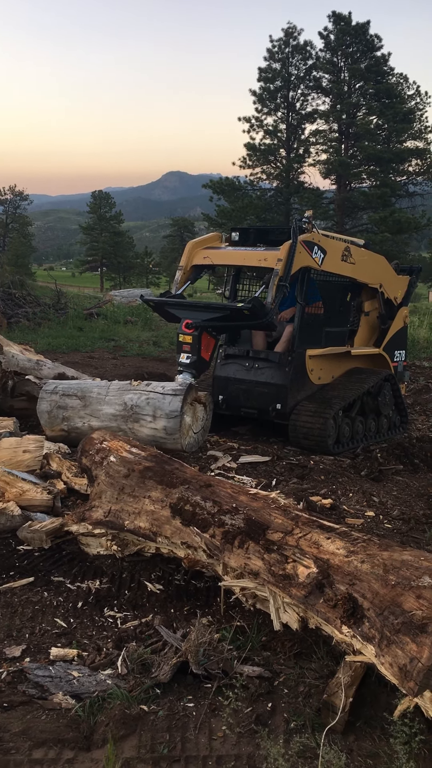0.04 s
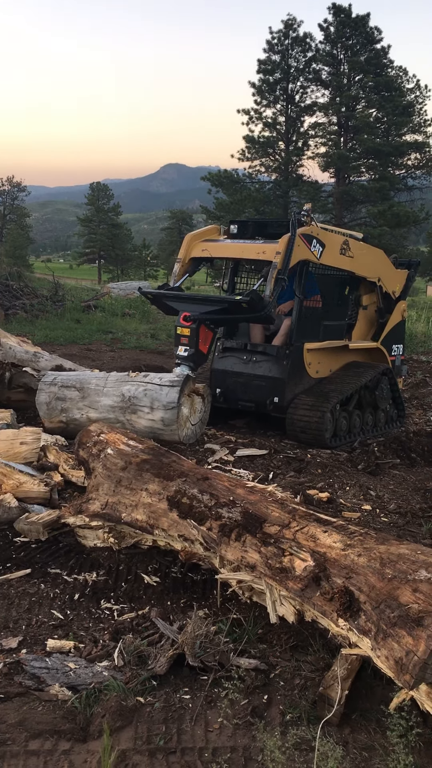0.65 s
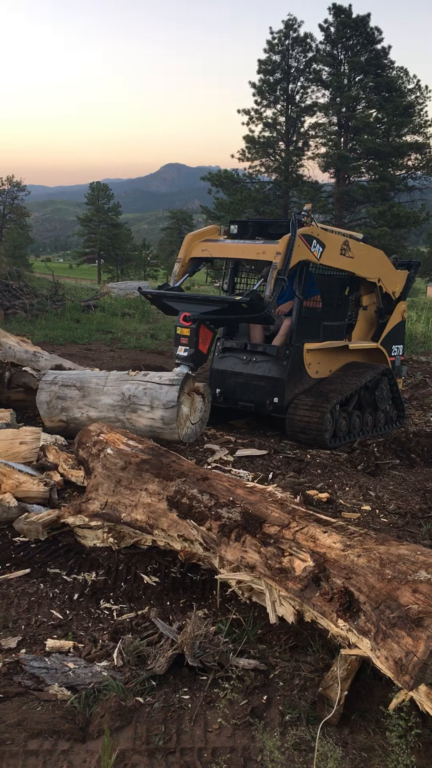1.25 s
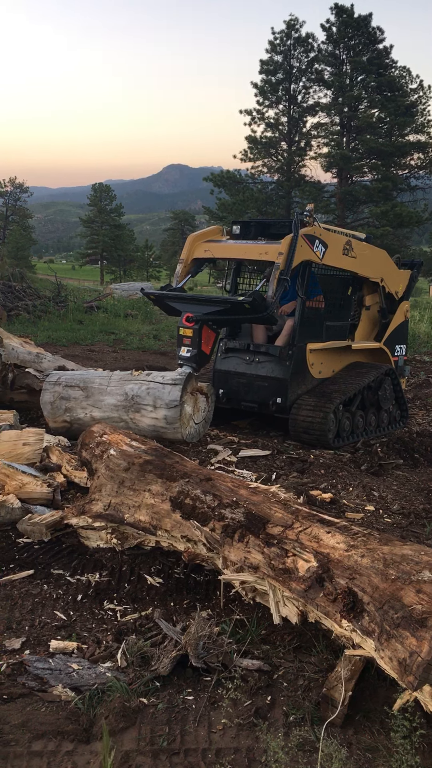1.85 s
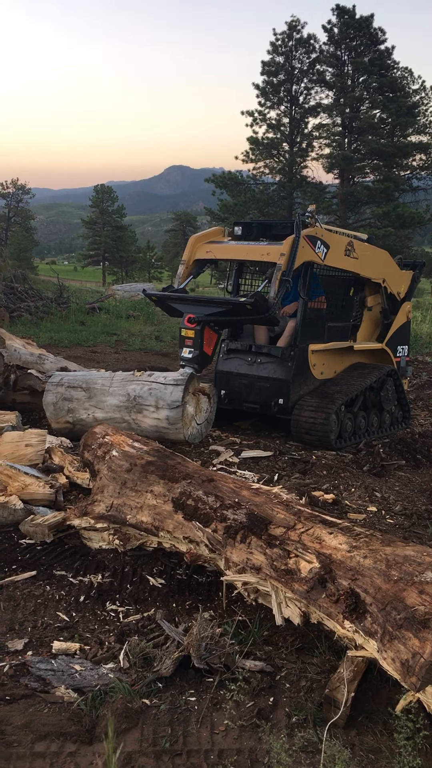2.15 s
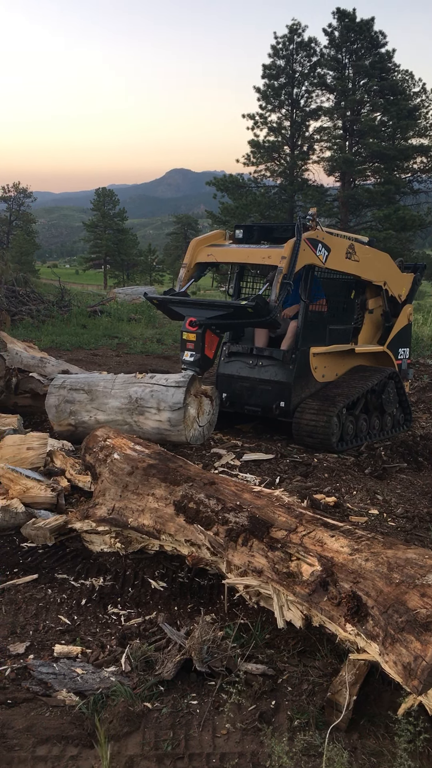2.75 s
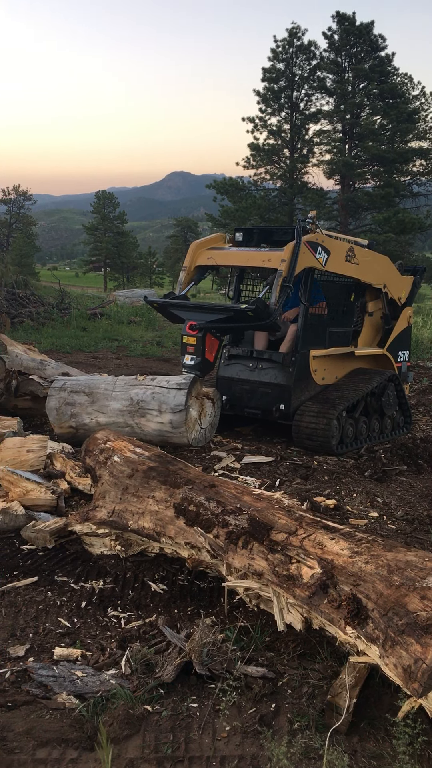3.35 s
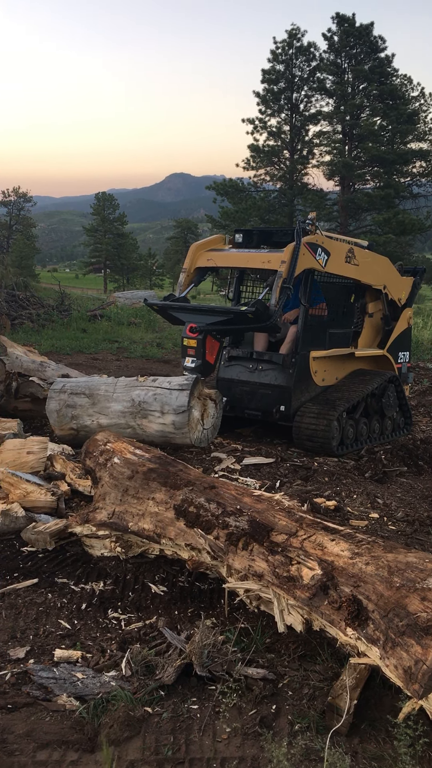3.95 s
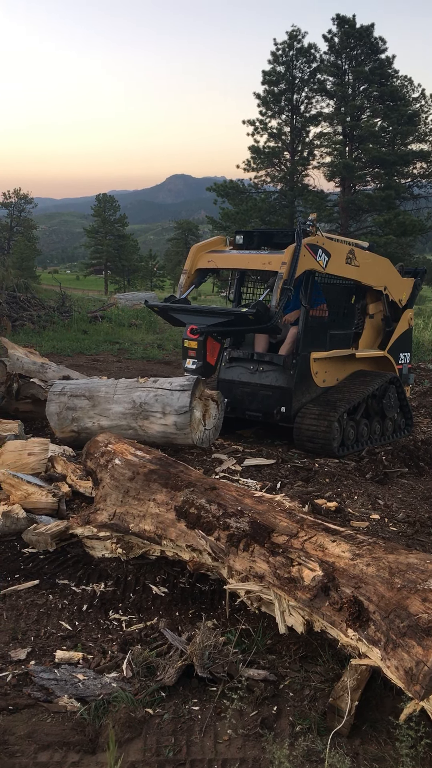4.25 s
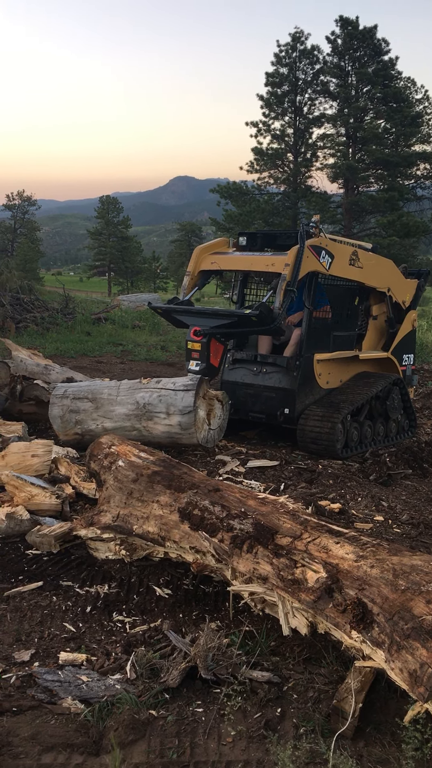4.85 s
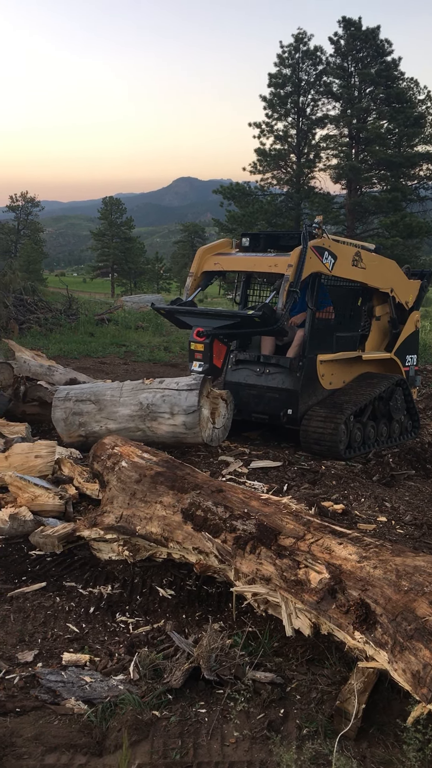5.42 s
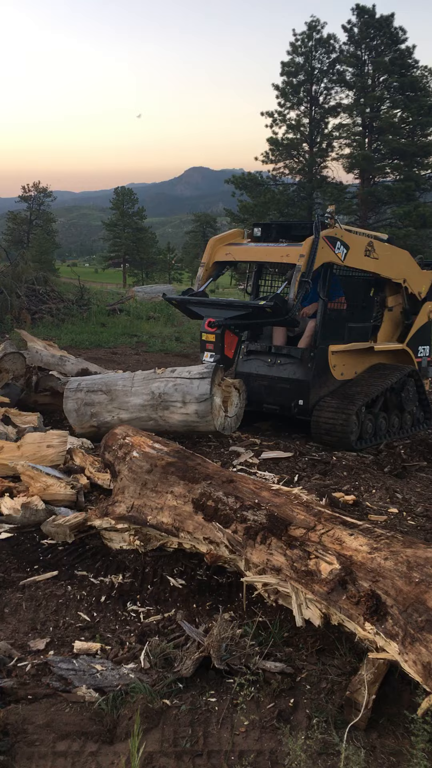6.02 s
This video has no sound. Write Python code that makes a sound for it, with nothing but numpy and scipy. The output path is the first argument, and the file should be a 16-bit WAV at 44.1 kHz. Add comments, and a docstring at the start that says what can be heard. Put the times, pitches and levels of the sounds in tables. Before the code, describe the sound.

In an open clearing, a few metres from the microphone, dry wood crackles and snaps over the low boom of a straining diesel engine. Louder cracks and deep woody thuds follow as a splitter forces the log apart. Midway the engine swells with a hiss of hydraulic oil, then runs faster and lighter, with a fan drone and a fine whine. A few more cracks and scattered snaps follow.

```python
"""In an open clearing, a tracked diesel loader drives a hydraulic splitter into a dry log.
Fibres snap and tear, and the trunk knocks as it opens. The engine booms under the load,
its fan drones, and oil hisses and whistles through a valve. Once the wood gives way,
the engine picks up speed, the boom fades and a whine takes over."""
import sys
import numpy as np
from scipy import signal
from scipy.fft import rfft, irfft
from scipy.io import wavfile
from scipy.ndimage import uniform_filter1d

SR = 44100
rng = np.random.default_rng(int(sys.argv[2]) if len(sys.argv) > 2 else 0)


def waveform_to_disk(signal):
    """Save audio, clipped to [-1, 1], as 16-bit WAV at the path in sys.argv[1]."""
    frames = np.transpose(np.atleast_2d(signal))
    scaled = np.clip(frames, -1, 1) * 32767
    samples = np.round(scaled).astype(np.int16)
    wavfile.write(sys.argv[1], SR, samples)


N = 268128
TIME = np.arange(N) / SR
AGE = np.arange(4096) / SR  # seconds since a break

# Deep splits that shake the whole log. Each row: start in seconds, tearing time in seconds,
# snap level in dB, ring pitch in Hz, knock level in dB, knock pitch in Hz, thud level in dB,
# thud pitch in Hz.
DEEP_SPLITS = [(1.0387, .003, -24, 2240, -32, 633, -47, 180),
               (1.486, .001, -16.5, 2070, -26.5, 594, -50, 169),
               (1.744, .011, -29, 1560, -32, 640, -44, 180),
               (1.8267, 0.0029, -26.5, 3760, -18, 723, -26, 180),
               (2.038, .0046, -26, 2010, -24.5, 602, -47, 190),
               (2.106, .0008, -21.5, 1730, -26.5, 553, -28.5, 184),
               (2.3618, 0.0016, -20, 2730, -14.5, 719, -11, 195),
               (2.4622, 0.0088, -22, 1200, -13, 710, -19, 201),
               (2.632, 0.0092, -28, 1690, -24, 468, -33, 190),
               (2.768, 0.028, -25, 1600, -24, 534, -25, 184),
               (3.091, .0027, -23, 1770, -20.5, 804, -18, 175),
               (3.1043, .015, -17, 1400, -18, 668, -13, 188),
               (3.122, .009, -33, 1520, -18.5, 673, -17, 174),
               (3.2569, 0.0025, -25, 1220, -21.5, 533, -26.5, 135),
               (3.375, 0.0029, -26.5, 2220, -22.5, 612, -31.5, 338),
               (3.778, 0.012, -24, 1200, -23.5, 505, -23, 214),
               (3.8097, 0.0045, -18, 2016, -14, 638, -13, 319),
               (3.816, 0.0046, -32, 2030, -34, 503, -17.5, 190),
               (3.9974, 0.0012, -33, 2050, -19, 412, -30, 342),
               (4.076, 0.012, -24, 1250, -18, 618, -28, 184),
               (4.238, 0.017, -23.5, 1560, -22.5, 785, -19.5, 175),
               (4.574, 0.0011, -30.5, 1530, -27, 740, -34, 196),
               (5.8641, 0.0014, -22, 1580, -22, 630, -38, 334)]

def splits():
    """Each split cracks and shakes the log; the deeper it lies, the duller it sounds."""
    out = np.zeros(N)
    for start, length, snap_db, ring_hz, knock_db, knock_hz, thud_db, thud_hz in DEEP_SPLITS:
        treble_db = snap_db - 10.5 - 0.33 * (knock_db - snap_db)
        add(out, start, crack(length, snap_db, ring_hz, treble_db))
        add(out, start + 0.00177, trunk(knock_db, knock_hz, thud_db, thud_hz))
        for lag, db in ((-0.008, -17), (0.024, -16)):  # a quieter strand parts before and after
            add(out, start + lag, crack(0.003, snap_db + db, ring_hz, treble_db + db))
    return out


# The tone of a snap, then of its bright spray. Each row: frequency in Hz, level in dB.
SNAP_COLOUR = [(350, -19), (700, -8.5), (1200, -1.5), (2000, 1.5), (2500, -6), (3600, -4), (4800, -11),
               (6500, -19)]
SPRAY_COLOUR = [(3000, -41), (5200, 3.5), (7000, -0.5), (9500, -2), (10500, -6.5), (12000, -5.5),
                (16000, -19.5)]

def crack(length, snap_db, ring_hz, treble_db):
    """A break rings the splinter it frees and sprays treble; long tears trail off for longer."""
    push = colour(tear(length, tail_db=0, tail_t60=0.055 + 2 * length), SNAP_COLOUR)
    splinter = burst(mode(ring_hz, rise=0.0006, t60=0.018), -1.5)
    splinter *= np.exp(-length / 0.01)  # a long tear smothers the ring
    overtone = burst(ring(push, ring_hz * rng.uniform(1.5, 2.3), q=14), -9)
    snap = burst(push, 0) + splinter + overtone
    spray = colour(tear(length + 0.0004, tail_db=-2.5, tail_t60=0.055 + length), SPRAY_COLOUR)
    return burst(snap, snap_db) + burst(spray, treble_db)


def tear(length, tail_db, tail_t60):
    """One fibre lets go and others follow, scattered briefly by the wood and the ground."""
    fibres = rng.standard_normal(len(AGE)) * amp(5.5 * rng.standard_normal(len(AGE)))
    run = burst(fibres * np.exp(-(AGE / length) ** 2), 0)
    first = burst(1.0 * (AGE == 0), -1.1) * np.exp(-length / 0.0015)  # strongest in short breaks
    tail = burst(rng.standard_normal(len(AGE)) * fade(tail_t60), tail_db)
    return run + first + tail


# The tone of the log's body. Each row: frequency in Hz, level in dB.
TRUNK_COLOUR = [(90, -23), (170, -12), (300, 0.5), (420, -1.5), (560, 2.5), (750, -0.5), (1100, -2),
                (2000, -10)]

def trunk(knock_db, knock_hz, thud_db, thud_hz):
    """The whole log knocks; its lowest notes swell later as the halves spring apart."""
    thud = mode(thud_hz, rise=0.0022, t60=0.08)
    thud += amp(-4.5) * mode(1.606 * thud_hz, rise=0.0051, t60=0.07)
    knock = mode(knock_hz, rise=0.0013, t60=0.064)
    knock += amp(-8.5) * mode(0.767 * knock_hz, rise=0.0032, t60=0.065)
    body = colour(tear(0.015, tail_db=-8.5, tail_t60=0.13), TRUNK_COLOUR)
    return burst(thud, thud_db) + burst(burst(knock, -3.5) + burst(body, 0), knock_db)


# Single splinters breaking. Each row: start in seconds, tearing time in seconds,
# snap level in dB, ring pitch in Hz, treble level in dB.
SPLINTER_SNAPS = [(0.189, .002, -33, 3100, -38.5), (.4308, .0024, -27.5, 2210, -33.5),
                  (.560, .01, -36.5, 2390, -35), (.617, .0004, -32.5, 2150, -38),
                  (.6807, .0006, -31, 3230, -36.5), (0.7566, 0.00045, -26.5, 1450, -30.5),
                  (0.8004, .001, -30.5, 1430, -43), (1.0055, 0.00067, -29.5, 2140, -39),
                  (1.141, 0.0067, -33.5, 3500, -42), (1.337, 0.0027, -24.5, 2020, -39),
                  (1.359, 0.00091, -34, 2060, -43), (1.634, 0.00069, -35, 3220, -38),
                  (1.656, 0.0009, -26.5, 2170, -43), (1.683, .002, -35.5, 3410, -39),
                  (1.864, .002, -32.5, 1910, -35), (1.962, 0.017, -29.5, 2090, -43),
                  (2.0314, .0006, -29.5, 2000, -33), (2.182, 0.00073, -36.5, 2040, -34.5),
                  (2.3024, 0.00045, -28, 1860, -31.5), (2.4185, .003, -34.5, 1960, -37),
                  (2.988, .005, -31.5, 2060, -43), (3.171, .0004, -30.5, 1470, -38.5),
                  (3.3348, 0.00043, -24, 3470, -31.5), (3.483, .002, -30, 1830, -34.5),
                  (3.559, .0004, -26, 1470, -38), (4.062, .0008, -32.5, 2040, -34),
                  (4.4968, .0006, -32, 1500, -36), (4.960, .0017, -33, 1730, -36.5),
                  (5.0052, 0.00063, -28, 2080, -40), (5.151, 0.015, -32.5, 2030, -48),
                  (5.537, .0007, -34.5, 1520, -35), (5.621, .009, -33, 3600, -42),
                  (5.830, 0.00065, -31, 2300, -36), (6.004, .0012, -24.5, 1530, -33.5)]

def snaps(count=16):
    """Splinters snap one by one, with fainter tearing scattered evenly among them."""
    out = np.zeros(N)
    for start, *splinter in SPLINTER_SNAPS:
        add(out, start, crack(*splinter))
    for slot, (when, size, pitch) in enumerate(rng.random((count, 3))):
        db = -41 + 5 * size
        add(out, (slot + when) / count * N / SR, crack(0.005, db, 1500 * 2 ** pitch, db - 9.5))
    return out


def crackle(count=60):
    """Tiny fibres tick, most of them early on while the wedge presses hardest."""
    out = np.zeros(N)
    for when, size, pitch in rng.random((count, 3)):
        push = tear(0.00019, tail_db=-8, tail_t60=0.083)
        ping = ring(push, hz=2500 * 4 ** pitch, q=8.4)
        tick = burst(colour(push, SPRAY_COLOUR), 0) + burst(ping, -0.5)
        add(out, when ** 1.6 * N / SR, burst(tick, -47.5 + 7 * size ** 2))
    return out


def sag(start=3.835, db=-29.5, hz=62):
    """A heavy half of the log settles onto the soil with a soft, deep bump."""
    out = np.zeros(N)
    swell = np.sin(np.pi * AGE / AGE[-1]) * fade(0.18)
    add(out, start, burst(swell * np.sin(2 * np.pi * hz * AGE), db))
    return out


# The exhaust boom swells in the last push, then sinks. Each row: time in seconds, level in dB.
BOOM_LEVEL = [(0, -27.5), (2.2, -25.5), (2.7, -28), (2.82, -21.5), (3.08, -24), (3.65, -34), (4.3, -47),
              (5.5, -37.5), (6.08, -41)]
# Engine and pump tones. Each row: multiple of the firing rate, dB under load, dB running free.
MACHINE_TONES = [(1.75, -49.5, -80), (2, -39, -43.5), (3, -52, -46), (3.87, -53.5, -49), (4, -54, -57),
                 (4.08, -45.5, -86), (4.5, -82, -51.5), (5.5, -78, -36.5), (5.75, -85, -48),
                 (6.5, -51.5, -47), (6.612, -66, -38), (7, -44.5, -65), (7.5, -72, -55), (9.25, -71, -49),
                 (9.75, -77, -54.5), (12, -51.5, -76), (12.24, -50.5, -56), (14, -56, -49.5),
                 (15.25, -78, -58)]
# The clatter of the engine block and cooling air. Each row: frequency in Hz, level in dB.
CLATTER_COLOUR = [(25, -21), (55, -2), (140, 0), (205, -2.5), (255, -6.5), (400, -3), (690, -2.5),
                  (830, -6), (1500, -7), (2100, -12), (3700, -15.5), (4900, -19), (9000, -21.5),
                  (10400, -30), (16000, -34.5)]

def engine(angle, load):
    """One shaft drives the exhaust boom, the machine's tones, the clatter and a thin whine."""
    boom_db, = curves(BOOM_LEVEL)
    out = tone(angle, boom_db)
    for multiple, loaded_db, free_db in MACHINE_TONES:
        out += tone(multiple * angle, free_db + load * (loaded_db - free_db))
    # unequal firings leave a rumble around the boom
    rumble = colour(rng.standard_normal(N), [(60, -1), (90, -12), (190, 5.5), (260, -16.5)])
    out += amp(boom_db - 18.5) * unit(rumble)
    # the clatter swells at each firing and each turn of the shaft
    beat = amp(0.17 * np.sin(angle) + 0.5 * np.sin(angle / 2) + 1.26 * walk(90))
    grit = rng.standard_normal(N) * amp(2 * walk(900))
    out += amp(-33.5 - 2.5 * load) * unit(colour(grit * beat, CLATTER_COLOUR))
    whine = tone(66.14 * angle + 0.36 * walk(200), db=-54.5 + 2 * walk(24.84))
    return out + ramp(3.5, 4.1) * whine  # it comes in once the machine runs free


# The load holds the engine back until the log gives. Each row: time in seconds, firings per second.
ENGINE_SPEED = [(0, 88.6), (.6, 88.05), (1.6, 87.65), (2.25, 87.6), (2.76, 88.3), (3.1, 98.1),
                (3.38, 103.8), (3.6, 104.7), (3.95, 104.9), (4.5, 106.1), (6.08, 106.3)]

def shaft():
    """The engine turns a little unsteadily; the angle goes once around for each firing."""
    hz, = curves(ENGINE_SPEED)
    return 2 * np.pi * np.cumsum(hz * (1 + 0.0004 * walk(14))) / SR


# Pitches at which the fan housing rings. Each row: pitch in Hz, width in Hz.
HOUSING_RINGS = [(527, 30), (602, 9), (623, 10), (638, 8)]
# The level of the drone on each of those pitches, in dB.
HOUSING_LEVELS = (-40, -34, -34, -40)

def fan(angle, multiple=6):
    """The cooling fan drones, swelling wherever its pitch makes the housing ring."""
    hz = multiple * curves(ENGINE_SPEED)[0]
    power = np.zeros(N)
    for (centre, width), db in zip(HOUSING_RINGS, HOUSING_LEVELS):
        power += amp(db) ** 2 / (1 + (2 * (hz - centre) / width) ** 2)
    return tone(multiple * angle, 10 * np.log10(power))


# Valve whistles, one list for each. Each row: time in seconds, pitch in Hz, level in dB.
VALVE_WHISTLES = [
    [(1.42, 8800, -57), (1.53, 8950, -54), (1.78, 8840, -54.5), (1.92, 8900, -46)],
    [(2.68, 12600, -66), (2.8, 12850, -63), (2.88, 13300, -62)],
    [(3.36, 9350, -60), (3.49, 9660, -54), (3.58, 11400, -60)],
    [(4.18, 7650, -60), (4.33, 7600, -59), (4.52, 7720, -57)],
]

def hydraulics(angle, load):
    """Oil hisses through the valve, the pump sings, and the valve whistles as the pressure shifts."""
    surge = ramp(2.7, 2.84) - ramp(3.2, 3.68)  # the last push sends a rush of oil
    hiss_db = -59 + 1.5 * load + 9.5 * surge
    hiss = ring(rng.standard_normal(N), hz=8770, q=7.2)
    out = amp(hiss_db) * unit(ring(hiss, hz=8770, q=7.2))
    strain = load ** 6
    for multiple, db in ((12.24, 2.5), (18.36, -0.7)):  # the pump's two tones
        out += strain * tone(multiple * angle + 0.38 * walk(90), hiss_db + db + 2 * walk(30))
    for whistle in VALVE_WHISTLES:
        hz, db = curves(whistle)
        start, end = whistle[0][0], whistle[-1][0]
        gate = uniform_filter1d(1.0 * ((TIME > start) & (TIME < end)), size=900)
        flutter = 1 + 0.013 * walk(900)
        wave = unit(np.sin(2 * np.pi * np.cumsum(hz * flutter) / SR))
        out += gate * amp(db + 3.2 * walk(70)) * wave
    return out


def clearing(x, t60=0.1, delay_s=0.012):
    """The machine, logs and trees send back a short scatter of echoes."""
    t = TIME[:SR // 2]
    echoes = rng.standard_normal(len(t)) * np.exp(-np.log(1000) * t / t60) * (t > delay_s)
    echoes = colour(echoes, [(100, -4), (1500, 8), (12000, 12)])
    return signal.fftconvolve(x, echoes / np.sqrt(np.sum(echoes ** 2)))[:N]


def mode(hz, rise, t60):
    """One natural note of the wood, swelling quickly and then dying away."""
    return (1 - np.exp(-(AGE / rise) ** 2)) * fade(t60) * np.sin(2 * np.pi * hz * AGE)


def tone(angle, db):
    """One machine tone, wavering a little on its way through the air."""
    waver = 0.08 * walk(25) + rng.uniform(0, 2 * np.pi)
    return np.sqrt(2) * amp(db + 0.89 * walk(7.4)) * np.sin(angle + waver)


def amp(db):
    """Turn decibels into a gain."""
    return 10 ** (np.asarray(db) / 20)


def curves(table):
    """Turn a table's columns into signals, joining the points with straight lines."""
    times, *columns = np.transpose(table)
    return [np.interp(TIME, times, column) for column in columns]


def unit(x):
    """Scale a sound to an average (rms) level of 1."""
    return x / np.sqrt(np.mean(x ** 2))


def burst(x, db):
    """Give a short sound the energy of 10 ms at this level."""
    return x * amp(db) / np.sqrt(np.sum(x ** 2) / (SR / 100))


def walk(rate):
    """A smooth random wander of size about 1, taking `rate` steps a second."""
    hold = int(SR / rate)
    steps = np.repeat(rng.standard_normal(N // hold + 2), hold)
    return unit(uniform_filter1d(uniform_filter1d(steps, hold), hold))[:N]


def colour(x, points, size=4096):
    """Shape a sound's tone along (Hz, dB) points, falling away beyond both ends."""
    hz, db = np.transpose(points)
    bins = np.maximum(np.arange(size // 2 + 1) * SR / size, 1)
    skirts = np.minimum(bins / hz[0], 1) * np.minimum(hz[-1] / bins, 1)
    gain = amp(np.interp(np.log(bins), np.log(hz), db)) * skirts ** 2
    # fold the filter so that it never rings before the sound arrives
    cepstrum = irfft(np.log(gain))
    cepstrum[1:size // 2] *= 2
    cepstrum[size // 2 + 1:] = 0
    return signal.fftconvolve(x, irfft(np.exp(rfft(cepstrum))))[:len(x)]


def ring(x, hz, q):
    """Make a sound ring at one pitch; a higher q rings longer."""
    return signal.lfilter(*signal.iirpeak(hz, q, fs=SR), x)


def fade(t60):
    """Die away by 60 dB in t60 seconds."""
    return np.exp(-np.log(1000) * AGE / t60)


def ramp(start, end):
    """Rise from 0 to 1 between two times in seconds."""
    return np.clip((TIME - start) / (end - start), 0, 1)


def add(track, start, x):
    """Mix a short sound in at a start time in seconds."""
    i = max(int(start * SR), 0)
    track[i:i + len(x)] += x[:max(N - i, 0)]


def scene():
    """The machine and the breaking log, a few metres off."""
    angle = shaft()
    load = 1 - ramp(3.02, 3.54)  # falls away as the log gives
    machine = engine(angle, load) + fan(angle) + hydraulics(angle, load)
    wood = splits() + snaps() + crackle() + sag()
    return (machine + wood + amp(-23) * clearing(wood))[None]


def record(dry):
    """The microphone rounds the loudest peaks and cuts the treble above 16000 Hz."""
    lowpass = signal.ellip(8, 0.2, 70, 16000, fs=SR, output="sos")
    return signal.sosfilt(lowpass, np.tanh(dry))


dry = scene()
out = record(dry)
waveform_to_disk(out)
```